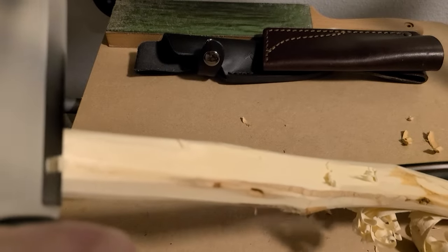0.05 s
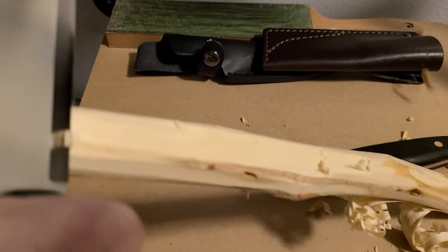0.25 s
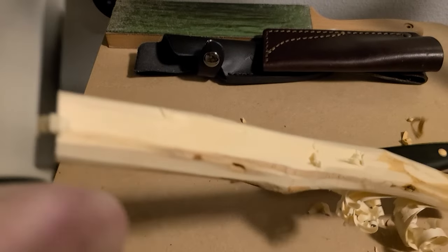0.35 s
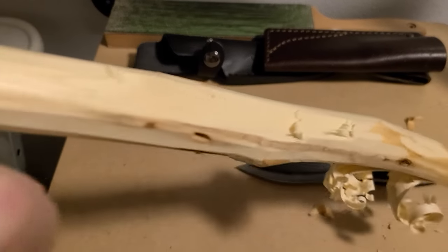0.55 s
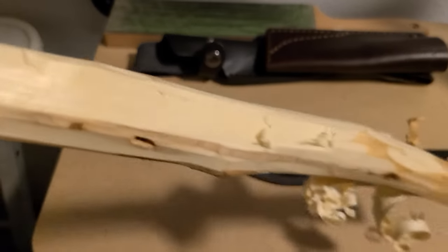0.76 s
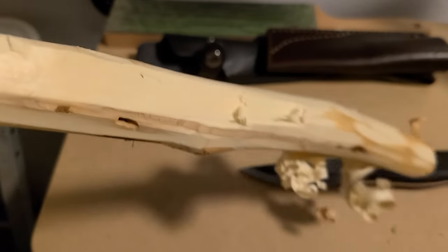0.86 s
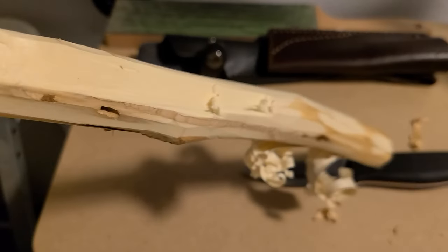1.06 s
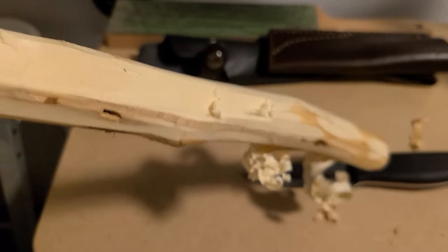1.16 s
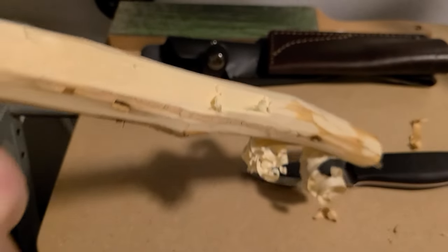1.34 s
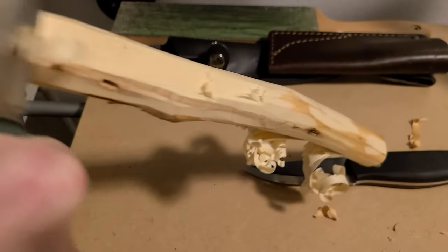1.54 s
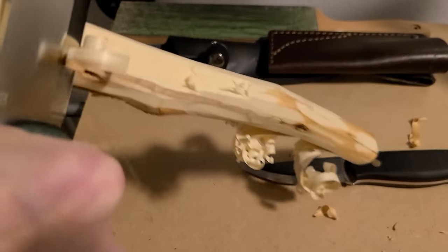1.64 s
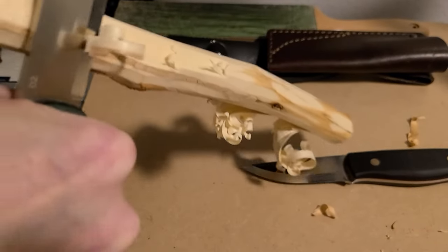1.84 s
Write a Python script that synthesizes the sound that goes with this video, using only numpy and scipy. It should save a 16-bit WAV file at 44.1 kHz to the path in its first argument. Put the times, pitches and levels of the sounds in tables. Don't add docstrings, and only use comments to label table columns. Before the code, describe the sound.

A knife drops onto a board on a table, rattles to rest, then faint wood-scraping strokes follow.

```python
import sys
import numpy as np
from scipy import signal
from scipy.fft import rfft, irfft, next_fast_len
from scipy.io import wavfile
from scipy.ndimage import uniform_filter1d, map_coordinates

SR = 44100
rng = np.random.default_rng(int(sys.argv[2]) if len(sys.argv) > 2 else 0)


def rack_gain(trim_db):
    fader = np.asarray(trim_db, float)
    return 10 ** (fader / 20)


def wav_record(signal):
    frames = np.transpose(np.atleast_2d(signal))
    bounded = np.clip(frames, -1, 1)
    quanta = np.round(bounded * 32767).astype(np.int16)
    wavfile.write(sys.argv[1], SR, quanta)


N = 83790

# pitch_hz, level_db (per Hz)
AIR_COLOUR = [(300, -35), (550, -4.5), (950, -6), (1500, -11.5), (3200, -19), (4900, -26.5), (6200, -44.5),
              (8000, -48), (9000, -34), (15700, -37)]
# pitch_hz, level_db (per Hz)
RUMBLE_COLOUR = [(15, -29), (40, -31), (102, 1), (151, -4.5), (184, -1.5), (263, -13.5), (430, -13.5),
                 (505, -18), (600, -37), (780, -40), (1320, -120)]
# pitch_hz, width_hz, level_db
HUM_TONES = [(116.4, 7.3, -57.5), (194.4, 4.5, -56.5), (188, 34, -67), (403, 11.7, -65),
             (446.2, 2.5, -62.5)]
# pitch_hz, likeness (-1 to 1)
BACKGROUND_LIKENESS = [(60, 0.91), (130, .98), (200, 0.95), (380, 0.053), (1290, -0.2), (2400, -0.29),
                       (15000, -0.16)]
# pitch_hz, time_to_fall_60_db_s
ROOM_DECAY = [(100, 0.94), (1000, 0.33), (4000, 0.088), (12000, 0.068)]
# pitch_hz, level_db
MIC_COLOUR = [(4000, -2.5), (5500, -10), (7000, -38.5), (9000, -4), (16000, -20)]

# time_s, level_db
SWAY_LEVEL = [
    (0, -66),
    (.2, -58),
    (.45, -55),
    (.55, -51),
    (.7, -69.5),
    (1.4, -72),
    (1.498, -55),
    (1.65, -66),
    (1.9, -71),
]
# start_s, level_db
TABLE_SHUDDERS = [(0.04, -39), (0.093, -34.5), (0.159, -33), (0.203, -23.5), (0.237, -19.5), (0.301, -22),
                  (0.362, -35), (0.47, -40), (1.476, -46), (1.568, -36.5), (1.732, -38.5)]

# start_s, length_s, level_db, peak_place (0-1), left_right_db
BLADE_STROKES = [(0, 0.14, -58.5, 0.8, 3.5), (.203, 0.023, -59, 0, 11), (.25, 0.064, -63, 1, -3),
                 (.302, 0.092, -56.5, 0.4, 1.5), (.475, .04, -84.5, 0.3, 6), (.6, .03, -77, 0.57, 7),
                 (.805, 0.07, -74, 0.81, 13), (.965, 0.038, -79, 0.6, 15.5), (1.036, 0.04, -68.5, 0, 3),
                 (1.165, 0.084, -62.5, 0.25, 10.5), (1.359, 0.034, -64.5, 0.93, 14),
                 (1.427, 0.25, -65, 0.13, 9), (1.49, 0.13, -53, 0.94, 8), (1.697, 0.075, -59, 0.04, 8.5),
                 (1.62, .04, -65, .5, 5), (1.831, 0.027, -58, 0.7, 8.5), (1.857, 0.045, -61, 0.2, 9.5)]
# start_s, length_s, level_db, peak_place (0-1), left_right_db
FLAT_GLIDES = [
    (1.168, 0.072, -63, 0.56, 6),
    (1.365, 0.023, -61, 1, 3),
    (1.435, 0.099, -68, 0.2, 7),
    (1.7, 0.05, -77, 0.1, 18),
]
# start_s, length_s, level_db, peak_place (0-1), left_right_db
DULL_SHIFTS = [
    (0, 0.38, -50.5, 0.8, -4),
    (.21, 0.23, -40.5, 0.25, 3),
    (1.03, 0.069, -55.5, 0.2, 0),
]
# start_s, length_s, level_db, peak_place (0-1), left_right_db
KNIFE_CHATTER = [
    (.212, 0.083, -45, .05, -0.5),
    (.31, 0.044, -47, 0.5, -1.5),
    (.365, 0.061, -52.5, 0.1, -3.5),
]
# pitch_hz, level_db (per Hz)
SCRAPE_COLOUR = [(710, -44), (1200, -6), (1520, -17), (1750, -12.5), (2410, -5), (5070, -11.5),
                 (6300, -16.5), (7600, -20.5), (8970, -16.5), (15700, -6.5)]
# pitch_hz, level_db (per Hz)
DULL_COLOUR = [(150, -34), (300, -12), (600, -7.5), (1200, -22.5), (2500, -26.5), (8000, -51)]
# pitch_hz, level_db (per Hz)
CHATTER_COLOUR = [(600, -40), (1200, -11), (2000, -7), (3000, 4), (4300, -16), (5600, -41), (7500, -65)]
# pitch_hz, width_hz, boost_db
STICK_PEAKS = [(2380, 270, 5.5), (3260, 280, 6.5), (4800, 540, 5), (9040, 830, 12)]
# pitch_hz, width_hz, boost_db
BLADE_PEAKS = [(4840, 300, 7), (5300, 450, 20)]
# start_s, peak_db
FIBRE_SNAPS = [(0.044, -48), (.121, -52.5), (0.361, -44), (0.49, -59), (.613, -72), (.636, -65),
               (.733, -56), (.745, -63), (0.823, -59), (.844, -76), (.883, -63), (.908, -74), (1.041, -39),
               (1.388, -54), (1.54, -48.5), (1.563, -54), (1.584, -44), (1.657, -58), (1.743, -72),
               (1.761, -56), (1.793, -70), (1.845, -46), (1.897, -50)]
# pitch_hz, level_db
SNAP_COLOUR = [(1500, -28), (3000, -12), (4600, -11), (6800, -52), (9000, -24.5), (12500, -6.5),
               (16000, -16)]

# start_s, pitch_hz, level_db,
# time_to_fall_60_db_s, left_right_db
CAUGHT_RINGS = [(.205, 539, -18, 0.027, 5), (.206, 982, -21.5, 0.047, 1), (.209, 1988, -22.5, 0.054, -2),
                (.206, 2692, -33.5, 0.11, 2), (.206, 3210, -30, 0.1, -5), (.206, 776, -24, 0.061, -6),
                (.235, 697, -27.5, 0.094, -1), (.279, 1115, -45, 0.097, -5), (.301, 1270, -15.5, 0.038, 3),
                (.306, 2046, -31, 0.057, -10), (.306, 1037, -25, 0.05, 1), (0.304, 156, -23, 0.083, 2.5),
                (.36, 2033, -41, 0.073, -12), (.362, 3177, -37, .045, 1), (.36, 1097, -24.5, 0.061, -5),
                (.396, 1060, -30, 0.064, 2), (.468, 1138, -45.5, 0.058, 7), (.548, 1142, -50.5, 0.044, 0)]
# start_s, level_db, thud_over_board_db, knife_over_board_db, board_tilt_db (per octave)
CONTACTS = [(0.1253, -24.5, -13.5, -14, 6.5), (0.162, -37.5, -4, -30, -37), (0.17, -31, -2, -30, -27),
            (0.2035, -7.5, 1, 4, 17.5), (0.207, -5, -4.5, -2.5, 4.5), (0.2369, -24.5, -9, 5, -21.5),
            (0.249, -28, -6, 0, -22), (0.3006, -11.5, 2.5, 4, 15), (.306, -8.5, -10.5, -2.5, -4),
            (0.341, -21, -18, -27, -9.5), (0.3596, -13, 1.5, 5.5, -8), (0.3677, -12.5, -34, -9, 19.5),
            (0.3959, -16, -8.5, 1, 16.5), (0.4154, -27, 1.5, -23.5, -29), (.426, -25, 7.5, -10, -6.5),
            (0.468, -22.5, -6.5, -11.5, 0.5), (.519, -35.5, 7.5, -3.5, -7), (0.549, -32.5, 3, -4, -12),
            (0.596, -47, -3, -2, -13), (0.617, -39.5, -8.5, -6, -3)]
# pitch_hz, level_db, time_to_fall_60_db_s
THUD_MODES = [(151.2, 6.5, 0.14), (168.5, 2, 0.19)]
# pitch_hz, level_db, time_to_fall_60_db_s
BOARD_MODES = [(294.6, -2, .11), (379, 3, 0.055), (424.5, 9, 0.028), (535, -2, 0.087), (658, -10, 0.19),
               (685, -14, 0.2), (751.4, -15, 0.053)]
# pitch_hz, level_db, time_to_fall_60_db_s
KNIFE_MODES = [(1026, 1.5, 0.096), (1174, 0, 0.091), (1393, -8.5, 0.1), (1409, -23, 0.093),
               (1988, -7.5, 0.08), (2250, -21, .08), (2692, -13, 0.1), (3155, -5.5, .08), (3210, -7.5, 0.1),
               (3570, -12, .08), (4260, 1.5, 0.03)]

AIR_DB, RUMBLE_DB = -62.5, -52.5
ROOM_DB, SCRAPE_ROOM_DB, ROOM_LOW_HZ = -17, -6.5, 450
SWAY_HZ, SWAY_WIDTH_HZ = 39.5, 14
SHUDDER_HZ, SHUDDER_S, SHUDDER_RISE_S = 71, 0.27, 0.015
FIBRES_PER_S, FIBRE_DB, FIBRE_SPREAD_DB, PATCHY_DB = 1700, -17.5, 6.5, 1.5
EDGE, SHIFT_EDGE, CHATTER_EDGE = .3, .64, .8
SNAP_S, SNAP_DB, SNAP_LEAN_DB = .008, 9.5, 8
RATTLE, RATTLE_S = .35, .004
RING_RISE_S, RING_DAMPS, RING_ROUGH, RING_TURN = 0.00061, 1.6, .5, .5
RING_DB, ATTACK_S, LONGEST_CYCLES = -10.5, .0004, 110
MODE_SCATTER_DB, DETUNE, SIDE_SCATTER = 1.5, .008, .3
CORNER_HZ, SOFTENS, SOFT_HZ = 5300, 1, 1270
CRACK_DB, CRACK_S = 6.5, 0.067
TOP_HZ = 15800


def unit(x):
    return x / np.sqrt(np.mean(x ** 2) + 1e-20)


def along(points, hz):
    f, v = np.transpose(points)
    return np.interp(np.log(hz + 1), np.log(f + 1), v)


def filtered(x, response):
    n = x.shape[-1]
    m = next_fast_len(n + 8192)
    return irfft(rfft(x, m) * response(np.fft.rfftfreq(m, 1 / SR)), m)[..., :n]


def wobble(rate):
    return map_coordinates(rng.standard_normal(N // 100), [np.arange(N) * rate / SR])


def pair(response, alike):
    def turn(hz):
        return np.arccos(np.clip(along(alike, hz), -1, 1)) / 2

    noise = rng.standard_normal((2, N))
    mid, side = filtered(noise, lambda hz: response(hz) * [np.cos(turn(hz)), np.sin(turn(hz))])
    return unit(np.array([mid + side, mid - side]))


def sides(db):
    return rack_gain(np.array([[db / 2], [-db / 2]]))


def add(into, s, sound):
    part = into[:, max(round(s * SR), 0):][:, :sound.shape[-1]]
    part += sound[:, :part.shape[-1]]


def room(x):
    hz, t, z = signal.stft(rng.standard_normal((2, SR // 2)), SR, nperseg=256)
    decay = rack_gain(-60 * t / along(ROOM_DECAY, hz)[:, None])
    tail = signal.istft(z * decay, SR, nperseg=256)[1]
    tail = filtered(tail / np.linalg.norm(tail[0]), lambda f: (1j * f / (ROOM_LOW_HZ + 1j * f)) ** 2)
    late = np.pad(x, ((0, 0), (200, 0)))
    return signal.fftconvolve(late, tail, axes=1)


def room_air():
    return rack_gain(AIR_DB + .8 * wobble(5.5)) * pair(lambda f: rack_gain(along(AIR_COLOUR, f)), BACKGROUND_LIKENESS)


def rumble():
    colour = pair(lambda f: rack_gain(along(RUMBLE_COLOUR, f)), BACKGROUND_LIKENESS)
    return rack_gain(RUMBLE_DB + 0.5 * wobble(6.2)) * colour


def hum():
    return sum(rack_gain(db) * pair(lambda f: 1 / (1 + ((f - hz) / w) ** 2), BACKGROUND_LIKENESS)
               for hz, w, db in HUM_TONES)


def sway():
    s, db = np.transpose(SWAY_LEVEL)
    level = rack_gain(np.interp(np.arange(N) / SR, s, db))
    return level * pair(lambda f: 1 / (1 + ((f - SWAY_HZ) / SWAY_WIDTH_HZ) ** 4), [(40, 0.91)])


def shudders():
    out, t = np.zeros((2, N)), np.arange(SR // 2)[None] / SR
    for s, db in TABLE_SHUDDERS:
        level = rack_gain(db - 60 * t / SHUDDER_S) * (1 - np.exp(-t / SHUDDER_RISE_S))
        add(out, s, level * np.sin(2 * np.pi * SHUDDER_HZ * t))
    return out


def strokes(rows, spectrum, peaks, edge=EDGE):
    t, press = np.arange(N) / SR, np.zeros((2, N))
    for s, length, db, top, lean_db in rows:
        shape = np.interp((t - s) / length, [0, np.clip(top, .05, .95), 1], [0, 1, 0])
        press += rack_gain(2 * db) * sides(2 * lean_db) * shape ** (2 * edge)

    def body(f):
        boost_db = sum(db / (1 + ((f - c) / w) ** 2) for c, w, db in peaks)
        return rack_gain(along(spectrum, f) + boost_db)

    chance, size = rng.random(N), rng.uniform(-0.36, 1, N)
    clicks = (chance < FIBRES_PER_S / SR) * rack_gain(FIBRE_SPREAD_DB * np.abs(size) * 5.3) * np.sign(size)
    hiss = pair(body, [(200, .95), (700, 0.67), (2000, 0.19), (9000, 0.057)])
    grit = hiss + rack_gain(FIBRE_DB) * unit(filtered(clicks, body))
    z = signal.stft(grit, nperseg=256)[2]
    field = uniform_filter1d(rng.standard_normal(z.shape[1:]), 3, 0)
    field = uniform_filter1d(field, 12, 1)
    grit = signal.istft(z * rack_gain(PATCHY_DB * unit(field)), nperseg=256)[1][:, :N]
    unsteady = rack_gain(2.8 * wobble(40.5) + 2.3 * wobble(180))
    return np.sqrt(press) * unsteady * unit(grit)


def snaps():
    out, t = np.zeros((2, N)), np.arange(1024) / SR
    for s, db in FIBRE_SNAPS:
        tick = rng.standard_normal(len(t)) + .5 * rng.standard_normal((2, len(t)))
        add(out, s, rack_gain(db + SNAP_DB - 60 * t / SNAP_S) * sides(SNAP_LEAN_DB) * tick)
    return filtered(out, lambda f: rack_gain(along(SNAP_COLOUR, f)))


def rings():
    out, t = np.zeros((2, N)), np.arange(SR // 3) / SR
    for s, hz, db, t60, lean_db in CAUGHT_RINGS:
        high = min(hz / 1500, 1)
        shake = uniform_filter1d(rng.standard_normal((2, len(t))), round(RATTLE_S * SR))
        shake = RING_ROUGH * unit(shake) * high
        apart = RING_TURN * high * rng.choice([-1, 1]) * np.array([[1], [-1]])
        turn = 2 * np.pi * hz * t + shake[0] + apart
        level = rack_gain(db - 60 * (t / t60) ** RING_DAMPS) * (1 - np.exp(-t / RING_RISE_S))
        add(out, s, sides(lean_db) * level * (1 + shake[1] / 2) * np.sin(turn))
    return out + rack_gain(ROOM_DB) * room(out)[:, :N]


def bounces():
    out, t = np.zeros((2, N)), np.arange(SR // 3) / SR
    hz, level, t60 = np.transpose(THUD_MODES + BOARD_MODES + KNIFE_MODES)[:, :, None]
    t60 = np.minimum(t60, LONGEST_CYCLES / hz)
    counts = [len(THUD_MODES), len(BOARD_MODES), len(KNIFE_MODES)]
    lean = SIDE_SCATTER * np.sign(rng.standard_normal(hz.shape)) * np.minimum(hz / 1000, 1)
    for s, db, thud_db, knife_db, tilt_db in CONTACTS:
        group_db = np.repeat([thud_db, 0, knife_db], counts)[:, None]
        group_db = group_db + np.repeat([0, tilt_db, 0], counts)[:, None] * np.log2(hz / 450)
        corner_hz = SOFT_HZ + CORNER_HZ * rack_gain(SOFTENS * db)
        scatter_db = MODE_SCATTER_DB * rng.standard_normal(hz.shape)
        gain = rack_gain(level + group_db + scatter_db - 60 * t / t60) / (1 + (hz / corner_hz) ** 6)

        shake = uniform_filter1d(rng.standard_normal((2, len(hz), len(t))), round(RATTLE_S * SR))
        shake *= np.sqrt(RATTLE_S * SR)
        shake *= RATTLE * np.minimum(hz / 1800, 1) * np.minimum(t / RATTLE_S, 1)
        turn = 2 * np.pi * hz * (1 + DETUNE * rng.standard_normal(hz.shape)) * t + shake[0]
        gain = gain * (1 + shake[1] / 2)
        ring = np.array([-(gain * rack_gain(6.4 * k * lean) * np.sin(turn + k * lean)).sum(axis=0)
                         for k in (1, -1)])

        crack = rng.standard_normal(len(t)) + 2.0 * rng.standard_normal((2, len(t)))
        crack = rack_gain(CRACK_DB + 0.63 * db - 60 * t / CRACK_S) * crack
        crack = filtered(crack, lambda f: 1 / (1 + 1j * f / (1.2 * corner_hz)) ** 4)

        def colour(f):
            low_cut = 1j * f / (90 + 1j * f)
            return rack_gain(along(MIC_COLOUR, f)) * low_cut / (1 + (f / (1.4 * corner_hz)) ** 4) ** .5

        blow = filtered(rack_gain(db + RING_DB) * (ring + crack) * (1 - np.exp(-t / ATTACK_S)), colour)
        add(out, s, blow)
        add(out, s, rack_gain(ROOM_DB) * room(blow))
    return out


def scene():
    background = room_air() + rumble() + hum() + sway() + shudders()
    blade = strokes(BLADE_STROKES, SCRAPE_COLOUR, STICK_PEAKS)
    blade += strokes(FLAT_GLIDES, SCRAPE_COLOUR, BLADE_PEAKS)
    blade += strokes(DULL_SHIFTS, DULL_COLOUR, [], SHIFT_EDGE)
    blade += strokes(KNIFE_CHATTER, CHATTER_COLOUR, [], CHATTER_EDGE)
    blade += snaps()
    blade_room = rack_gain(SCRAPE_ROOM_DB) * room(blade)[:, :N]
    return background + blade + blade_room + rings() + bounces()


def top_cut(x):
    return signal.sosfilt(signal.butter(12, 16500, fs=SR, output="sos"), x)


def record(dry):
    mix = filtered(dry, lambda hz: hz < TOP_HZ)
    return top_cut(mix)


dry = scene()
out = record(dry)
wav_record(out)
```